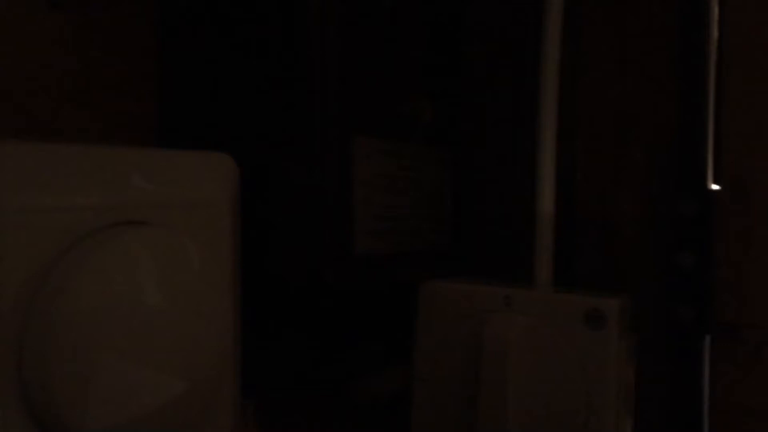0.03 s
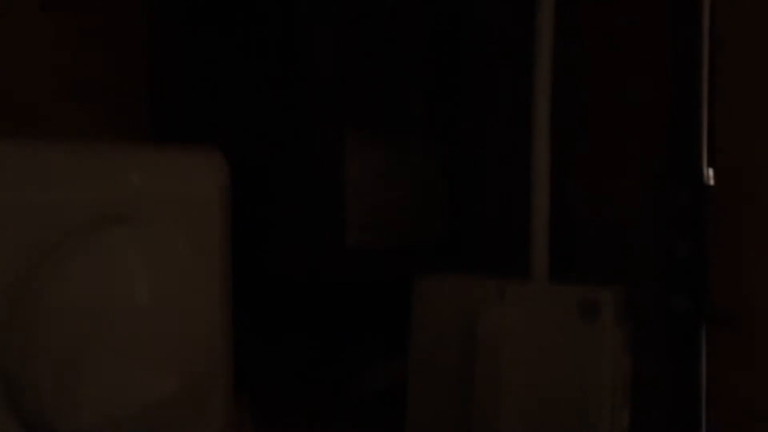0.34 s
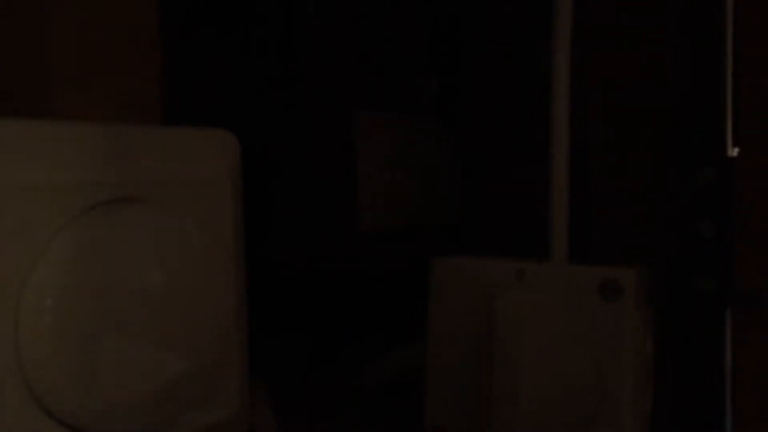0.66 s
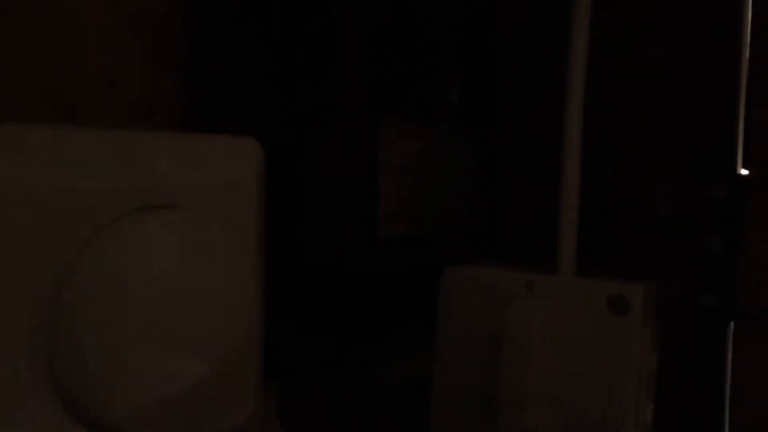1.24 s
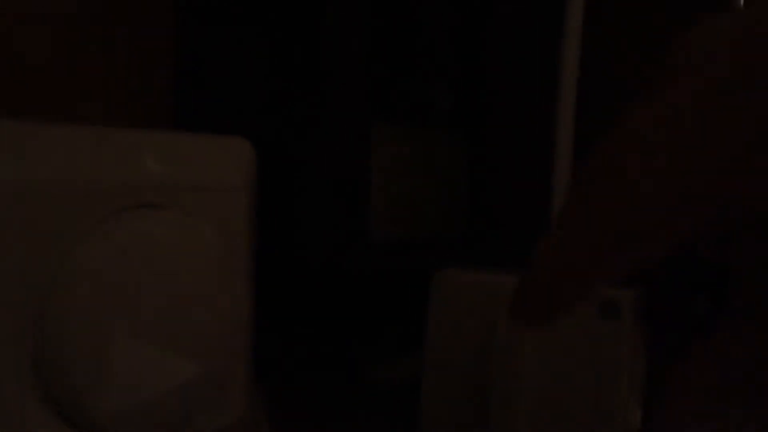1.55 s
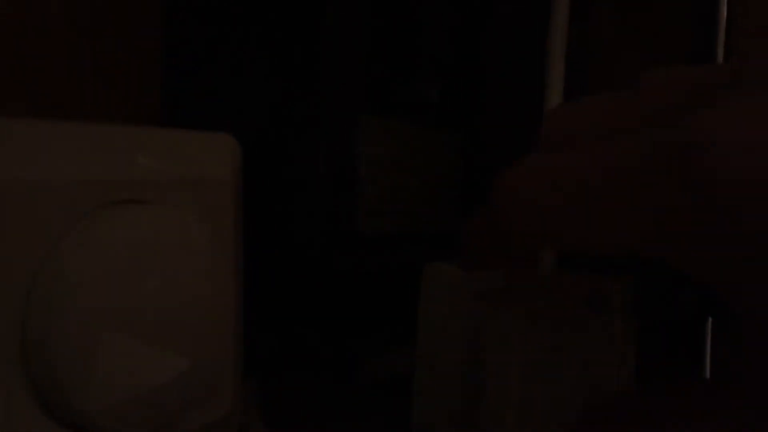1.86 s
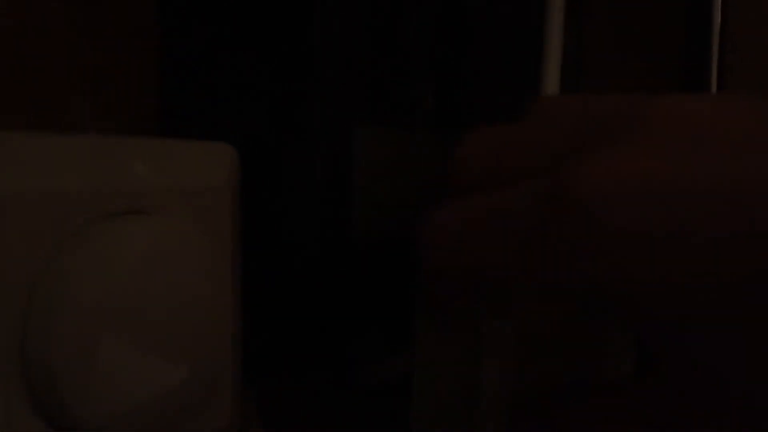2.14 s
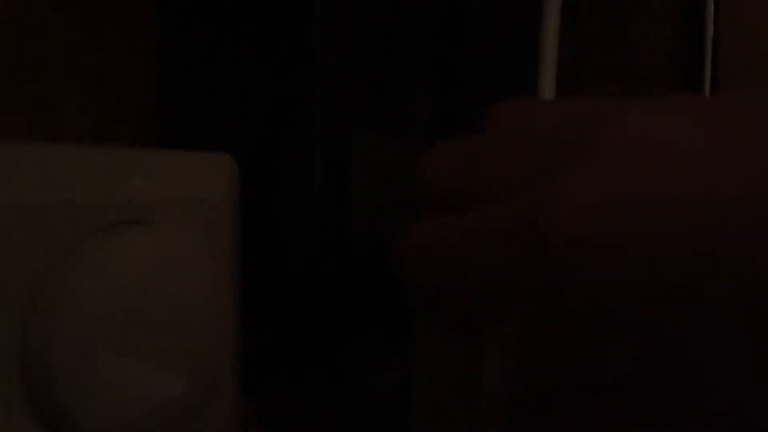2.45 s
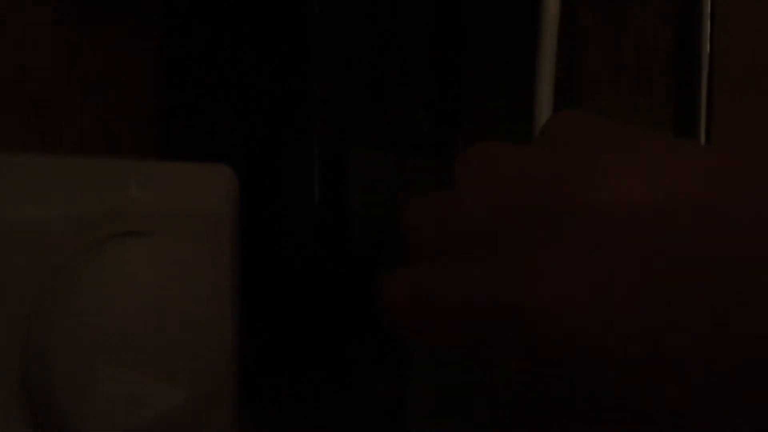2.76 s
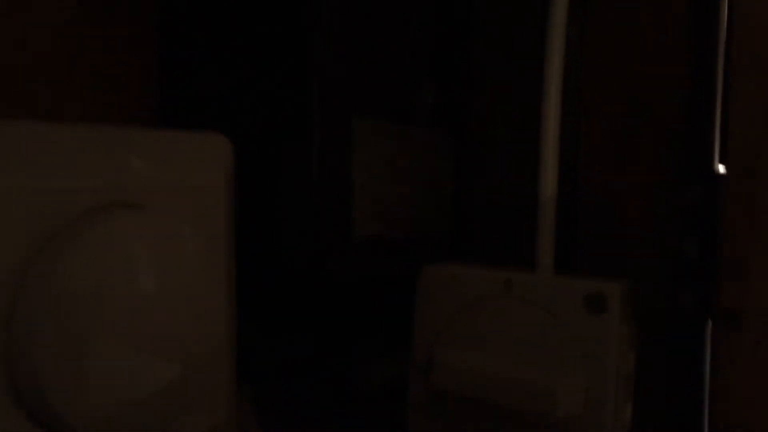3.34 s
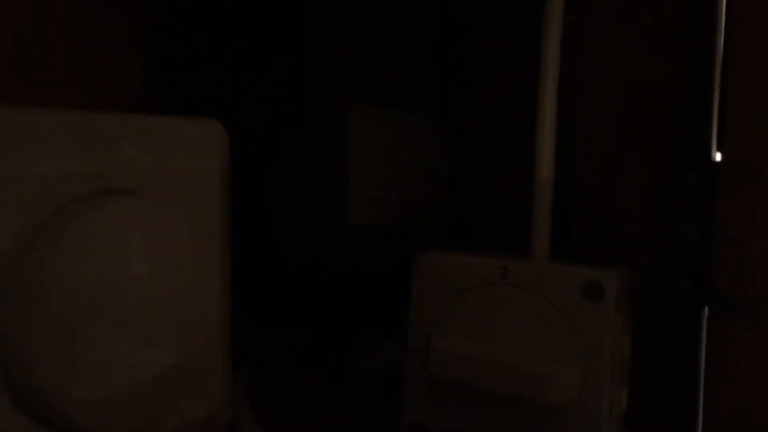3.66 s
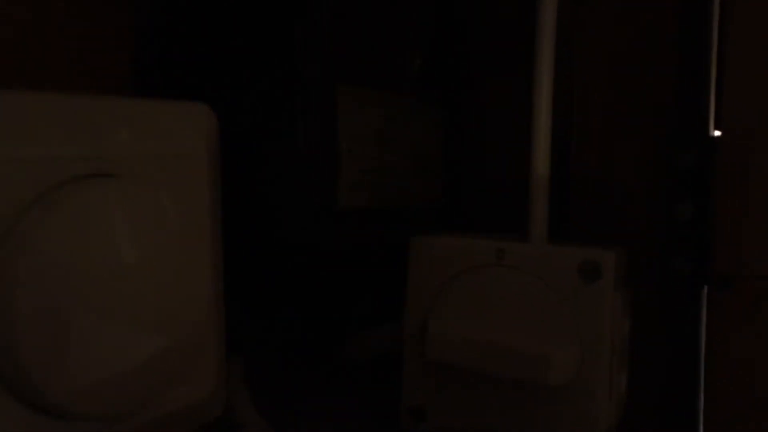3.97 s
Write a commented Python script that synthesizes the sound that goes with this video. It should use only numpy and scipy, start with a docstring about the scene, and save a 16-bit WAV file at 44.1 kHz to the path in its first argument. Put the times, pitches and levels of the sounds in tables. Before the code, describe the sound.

A stiff wall switch is worked close to the microphone in a small quiet room. After a soft sleeve rustle and hand bump, it gives a few small clicks, then one sharp springy clack, over faint electrical buzz and hiss.

```python
"""Faint mains buzz and hiss in a small quiet room, with one microphone close to a stiff wall switch.
A sleeve rustles, a hand bumps softly, and a far-off drone sinks in pitch. Then the switch is worked:
its latch clicks, the lever takes up its slack, the spring snaps it over and it rebounds.
Each contact cracks and rings the steel spring, the plastic case and the wall; the room answers."""
import sys
import numpy as np
from scipy import signal
from scipy.fft import rfft, irfft
from scipy.io import wavfile

SR = 44100
rng = np.random.default_rng(int(sys.argv[2]) if len(sys.argv) > 2 else 0)


def transcribe(u):
    """Save the signal u as a 16-bit wav file named by the first command-line argument.

    u: samples, shape (n,) or (channels, n), limited to [-1, 1]; the rate is SR.
    q: integer samples, one column per channel.
    """
    v = np.clip(np.atleast_2d(u).T, -1, 1)
    q = np.round(v * 32767).astype(np.int16)
    wavfile.write(sys.argv[1], SR, q)


N = 176400
T = np.arange(N) / SR
CUTOFF_HZ, RING_SAMPLES = 16200, SR * 2 // 3
CRACK_RISE_S, WALL_RISE_S = .0003, .004


def amp(db):
    """Decibels to gain."""
    return 10 ** (np.asarray(db) / 20)


def unit(x):
    """Scales to energy 1."""
    return x / np.sqrt(np.sum(x ** 2) + 1e-30)


def read(points, hz, column=1):
    """Reads a column of a table on a log-frequency axis."""
    table = np.array(points, float)
    return np.interp(np.log(hz + 1), np.log(table[:, 0] + 1), table[:, column])


def add(mix, start_s, sound):
    """Mixes a sound in at start_s."""
    part = mix[round(start_s * SR):][:len(sound)]
    part += sound[:len(part)]


def noise(spectrum, top_hz=CUTOFF_HZ):
    """Steady noise of rms 1 with the given spectrum."""
    hz = np.fft.rfftfreq(N, 1 / SR)
    shaped = rfft(rng.standard_normal(N)) * amp(read(spectrum, hz)) * (hz < top_hz)
    return unit(irfft(shaped, N)) * np.sqrt(N)


def causal(gain):
    """Shortest causal impulse response with this magnitude."""
    log_gain = np.log(np.maximum(np.r_[gain, gain[-2:0:-1]], 1e-5))
    return np.fft.ifft(np.exp(np.conj(signal.hilbert(log_gain)))).real


def ring(modes, rise_s, focus_hz=None, focus_octaves=.36):
    """Dying modes of a struck body, total energy 1; those near focus_hz are excited most."""
    t = T[:RING_SAMPLES]
    hz, db, t60 = np.array(modes, float).T[:, :, None]
    weight = 1 / (1 + (np.log2(hz / focus_hz) / focus_octaves) ** 2) if focus_hz else 1
    waves = weight * amp(db - 60 * t / t60) * np.sin(2 * np.pi * (hz * t + rng.random(hz.shape)))
    return unit(waves.sum(0) * (1 - np.exp(-t / rise_s)))


def buzz(rate_hz=100, top_order=152, scatter_db=1.2, fizz_decay_s=.003):
    """Mains buzz: strong low partials, and a short dying fizz in every cycle."""
    # low partials (multiple of the buzz rate)
    low_orders = [4, 5, 6, 7, 8, 9, 10, 11, 12, 13, 14, 15, 16, 18, 19, 20]
    # strength of each low partial (level [dB])
    low_db = [-76.5, -72, -65.5, -74, -74.5, -67.5, -72.5, -67.5, -99.5, -67, -77.5, -76.5, -76, -72, -71,
              -78.5]
    # outline of the upper partials (frequency [Hz], level per partial [dB])
    fizz = [(2100, -91.5), (2400, -84), (2700, -93), (3700, -92.5), (3950, -85.5), (4300, -93), (4700, -86),
            (5100, -96), (5700, -86), (6000, -90), (6800, -89), (7100, -82), (7900, -95.5), (8750, -85),
            (9200, -99), (9650, -90.5), (9850, -77.5), (10250, -89), (10650, -106), (11400, -97.5),
            (12000, -97), (12800, -85.5), (13900, -100), (14600, -79.5), (15200, -97)]
    orders, t = np.arange(low_orders[0], top_order + 1), T[:SR // rate_hz]
    db = read(fizz, orders * rate_hz) + scatter_db * rng.standard_normal(len(orders))
    db[np.array(low_orders) - orders[0]] = low_db
    # the phases of a dying burst bunch the energy early in the cycle
    phase = np.angle(rfft(rng.standard_normal(len(t)) * np.exp(-t / fizz_decay_s)))[orders]
    partials = np.cos(2 * np.pi * np.outer(orders * rate_hz, t) + phase[:, None])
    return np.resize(np.sqrt(2) * amp(db) @ partials, N)


def hiss(level_db=-62):
    """Room tone: steady hiss, strongest in the bass."""
    # noise floor (frequency [Hz], relative density [dB])
    spectrum = [(20, -30), (45, -9.5), (90, 4.5), (150, -9.5), (240, -5.5), (400, -11), (600, -9.5),
                (1000, -10), (1900, -15), (2800, -27), (7000, -26), (11000, -26.5), (15000, -26)]
    return amp(level_db) * noise(spectrum, top_hz=15400)


def shuffle():
    """Low shuffling of someone moving near the microphone."""
    # dull movement noise (frequency [Hz], relative density [dB])
    spectrum = [(20, -14), (60, -14), (100, -7), (150, -4.5), (260, -3.5), (400, -12), (900, -19),
                (16000, -68)]
    # swells of movement (time [s], level [dB])
    swells = [(.12, -69), (.4, -68.5), (.75, -60.5), (.95, -62), (1.3, -63.5), (1.8, -63.5), (2.5, -67.5),
              (2.85, -71), (3.25, -54.5), (3.55, -72.5), (4, -67)]
    return noise(spectrum) * amp(np.interp(T, *np.transpose(swells)))


def sleeve_rustle(grain_s=.006, grain_db=1.5):
    """A sleeve's grainy rustle as the arm reaches out."""
    # rubbing cloth (frequency [Hz], relative density [dB])
    spectrum = [(100, -29), (600, 2), (1300, 3), (2000, 7), (2800, -2), (4000, -5), (8000, -7.5),
                (15000, -12)]
    # strokes of the sleeve (time [s], level [dB])
    strokes = [(.3, -85), (.6, -63), (.72, -65), (.84, -66), (.89, -57), (.94, -66), (1.3, -73),
               (1.36, -64), (1.42, -77), (1.7, -73), (2.1, -79.5), (4, -73.5)]
    knots = np.arange(0, T[-1], grain_s)
    flicker_db = grain_db * np.interp(T, knots, rng.standard_normal(len(knots)))
    return noise(spectrum) * amp(np.interp(T, *np.transpose(strokes)) + flicker_db)


def handling_bumps():
    """Soft touches of the hand, each ringing a few low modes."""
    # touches (time [s], energy [dB])
    touches = [(0.813, -9.5), (0.888, -19), (.911, -21), (1.036, -32), (1.069, -27.5)]
    # modes of a dull bump (frequency [Hz], relative level [dB], t60 [s])
    modes = [(64, -10, 0.11), (105, 1, 0.078), (160, 0, 0.047), (209.6, -5, 0.16), (266, 3, 0.057)]
    bumps = np.zeros(N)
    for start_s, db in touches:
        add(bumps, start_s, amp(db) * ring(modes, rise_s=.014))
    return bumps


def drone(waver_hz=12, waver_depth=.2):
    """A faint wavering tone and its octave, like far traffic through the walls."""
    # sinking fundamental (time [s], pitch [Hz], level [dB])
    glide = [(.6, 235.3, -76), (0.899, 228.7, -62), (1.15, 220.3, -64.5), (1.26, 204, -54.5),
             (1.33, 202.8, -61), (1.4, 201.8, -54), (1.53, 201.6, -52.5), (1.65, 200, -58.5),
             (1.78, 193, -64), (1.88, 185, -56.5), (2.05, 183.9, -57), (2.15, 184.4, -64.5),
             (2.27, 187.1, -72), (2.5, 188.8, -57), (2.65, 182.8, -68), (2.849, 168.8, -65),
             (3.3, 165, -80)]
    # second partial (time [s], level [dB])
    octave = [(.9, -98), (1.4, -72.5), (1.8, -69), (2.1, -70), (2.3, -77), (2.9, -76)]
    times, hz, db = np.transpose(glide)
    carrier = np.exp(2j * np.pi * np.cumsum(np.interp(T, times, hz)) / SR)
    lowpass = signal.butter(2, waver_hz, fs=SR, output="sos")
    drift = signal.sosfilt(lowpass, rng.standard_normal((2, N)))
    tone = carrier * (1 + waver_depth * np.sqrt(N) * (unit(drift[0]) + 1j * unit(drift[1])))
    octave_db = np.interp(T, *np.transpose(octave))
    return np.sqrt(2) * (amp(np.interp(T, times, db)) * tone + amp(octave_db) * tone ** 2).real


def switch(wall_ring_db=-2.5, thud_db=1.5, spring_send_db=-6):
    """Close up, each contact cracks and rings the enclosed spring, the case and the wall."""
    # contacts in the switch (time [s], crack [dB], crack cut-off [Hz], spring [dB], case [dB],
    # case's most excited pitch [Hz], wall drive [dB], room send [dB])
    contacts = [(2.169, -30, 8050, -39, -36, 1516, -27.5, 2),
                (2.2951, -22.5, 15000, -41, -45, 2000, -39, -3),
                (2.3027, -23, 6000, -41, -13, 990, -28, -9.5),
                (2.3056, -10.5, 20000, -13.5, -11, 1540, -17.5, -10),
                (2.3092, -30.5, 14000, -19, -6.5, 1560, -22, -0.5),
                (2.463, -60, 2000, -57, -38, 900, -30.5, -3.5),
                (2.7027, -11, 3400, -31, -8.5, 2017, -19.5, -7), (2.9177, 5, 7500, 3.5, 1, 2970, -8, -3),
                (2.9212, -3, 9000, -2, -3.5, 2500, 2, -3), (2.9234, 4.5, 9000, -2.5, 5, 1770, -1.5, 1.5),
                (2.9364, -12, 1200, -29.5, -12.5, 1310, 0, 2.5),
                (2.9804, -19, 10000, -25, -14, 1700, -24, -6),
                (2.99, -4.5, 3400, -26, -7, 1500, -10.5, -0.5),
                (2.9917, -4, 3000, -33, -4.5, 1920, -6.5, -5)]
    # steel spring and contacts (frequency [Hz], relative level [dB], t60 [s])
    spring_modes = [(5195, -7, .02), (5800, -3, .02), (5930, 0, .02), (6340, -8, .018), (7170, -11, .018),
                    (7650, -9, .018), (8958, -12, .018), (9690, -10, .018), (10550, -7, .016),
                    (11500, -11, .014), (14530, -10, .012)]
    # plastic case (frequency [Hz], relative level [dB], t60 [s])
    case_modes = [(902, -8, 0.029), (1130, 2, 0.018), (1425, -7, 0.047), (1600, 0, 0.015),
                  (1638, -3, 0.024), (1958, -1.5, 0.016), (2160, -5.5, 0.016), (2433, 1, 0.012),
                  (2647, -3.5, 0.03), (2860, -8.5, .02), (3560, -8, 0.03)]
    # box and the wall behind it (frequency [Hz], relative level [dB], t60 [s])
    wall_modes = [(98, -11.5, 0.1), (218.3, -11.5, .2), (275, -2.5, 0.065), (322, -10, .2),
                  (464.7, -4.5, 0.18), (542.7, 2.5, 0.08), (633, -1, .08), (665, -5.5, .12),
                  (806.5, -11, .08), (874, -14.5, 0.074)]
    direct, sent = np.zeros((2, N))
    for start_s, crack_db, cut_hz, spring_db, case_db, focus_hz, wall_db, room_db in contacts:
        for sound, send_db in (
                (amp(crack_db) * crack(cut_hz), 0),
                (amp(spring_db) * ring(spring_modes, CRACK_RISE_S), spring_send_db),
                (amp(case_db) * ring(case_modes, CRACK_RISE_S, focus_hz), 0),
                (amp(wall_db + wall_ring_db) * ring(wall_modes, WALL_RISE_S), 0),
                (amp(wall_db + thud_db) * thud(), 0)):
            add(direct, start_s, sound)
            add(sent, start_s, amp(room_db + send_db) * sound)
    return direct + room(sent)


def crack(cut_hz, t60_s=.012, size=2048):
    """A few milliseconds of contact noise, duller for a softer contact."""
    # contact noise before the cut-off (frequency [Hz], relative density [dB])
    spectrum = [(60, -27), (400, -5), (1200, 1), (3000, 2), (4200, -0.5), (5500, 1.5), (7500, -1),
                (10500, 1), (13000, -1), (14800, 0.5), (16000, -14)]
    t, hz = T[:size], np.fft.rfftfreq(size, 1 / SR)
    burst = rng.choice([-1., 1.], size) * (1 - np.exp(-t / CRACK_RISE_S)) * amp(-60 * t / t60_s)
    colour = amp(read(spectrum, hz)) / np.hypot(1, (hz / cut_hz) ** 2)
    return unit(signal.fftconvolve(burst, causal(colour)))


def thud(t60_s=.12):
    """Many overlapping wall modes: low noise that swells quickly and dies."""
    # dense, unpitched part of the wall's sound (frequency [Hz], relative density [dB])
    spectrum = [(40, -34.5), (100, -9), (160, -10.5), (250, -8.5), (380, -3), (480, 0), (600, 4.5),
                (900, -1), (1300, -16.5), (3000, -29), (16000, -70)]
    t = T[:SR // 2]
    return unit(noise(spectrum)[:len(t)] * (1 - np.exp(-t / WALL_RISE_S)) * amp(-60 * t / t60_s))


def room(sound, early_t60_s=.21, flutter_s=.025, flutter_db=1.8, echo_top_hz=5100, size=256):
    """Quick reflections from the nearby corner, a few echoes, then the uneven tail of the room."""
    # reverberation (frequency [Hz], tail t60 [s], tail level [dB], early level [dB])
    bands = [(57.4, .7, -19, -26.5), (200, 0.66, -5.5, -23), (495, 1, -15.5, -15), (1000, 1, -16, -19.5),
             (2000, 1, -16.5, -9), (3500, 0.64, -12.5, -9.5), (5870, 0.73, -22, -12),
             (10000, .28, -35, -13.5), (16330, 0.18, -21, -12)]
    # single reflections off the walls (delay [s], level [dB])
    echoes = [(.024, -24.5), (.041, -25.5), (.062, -37)]
    hz, t, (early, tail) = signal.stft(rng.standard_normal((2, SR)), SR, nperseg=size)
    knots = np.arange(100) * flutter_s
    flutter = amp(flutter_db * np.interp(t, knots, rng.standard_normal(len(knots))))
    response = np.zeros(2 * SR)
    for part, t60, db, delay_s in (
            (early, np.full(len(hz), early_t60_s), read(bands, hz, column=3), .003),
            (tail * flutter, read(bands, hz), read(bands, hz, column=2), .015)):
        rate = np.log(1000) / t60[:, None]
        decay = amp(db)[:, None] * np.sqrt(2 * rate / SR) * np.exp(-rate * t)
        add(response, delay_s, signal.istft(part * decay, SR, nperseg=size)[1])
    for delay_s, db in echoes:
        add(response, delay_s, amp(db) * signal.firwin(31, echo_top_hz, fs=SR))
    return signal.fftconvolve(sound, response)[:N]


def scene():
    """At the microphone, in mono: the close switch over buzz, hiss, small movements and the far drone."""
    mix = switch() + buzz() + hiss()
    mix += shuffle() + sleeve_rustle() + handling_bumps() + drone()
    return mix[None]


def record(dry, start_s=.12):
    """The recorder opens after a moment, clips at full scale and limits the band."""
    live = np.clip(dry, -1, 1) * (T >= start_s)
    lowpass = signal.firwin(511, CUTOFF_HZ, window=("kaiser", 9), fs=SR)
    return signal.oaconvolve(live, lowpass[None], "same")


dry = scene()
out = record(dry)
transcribe(out)
```